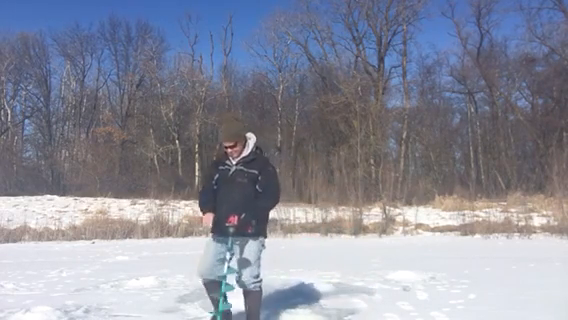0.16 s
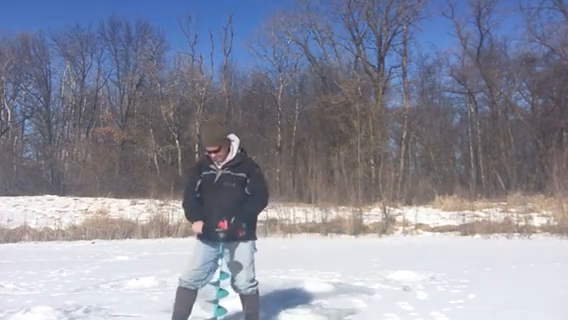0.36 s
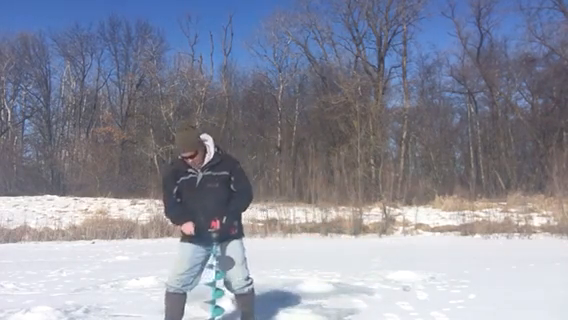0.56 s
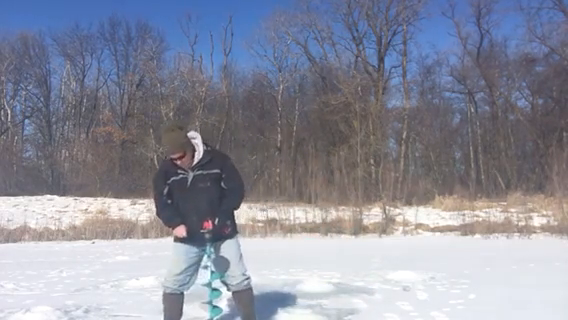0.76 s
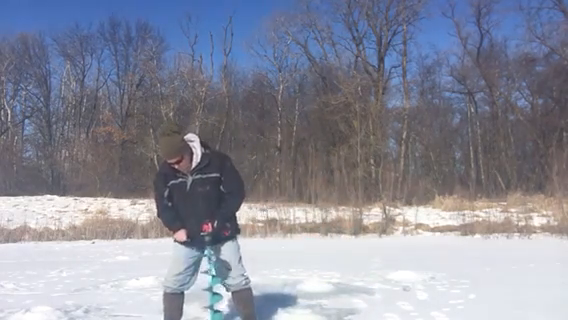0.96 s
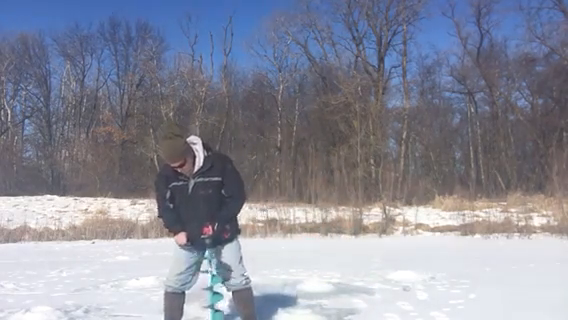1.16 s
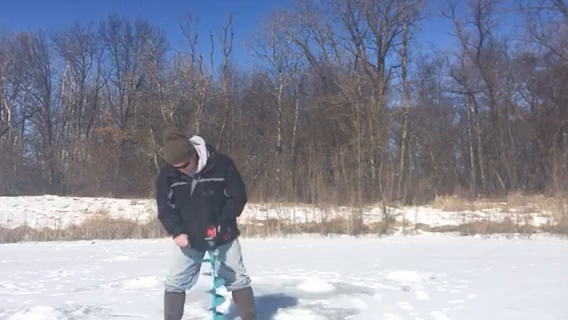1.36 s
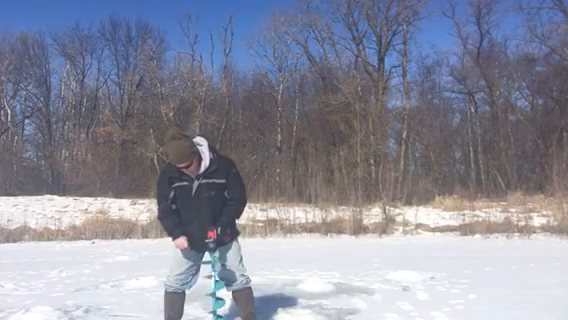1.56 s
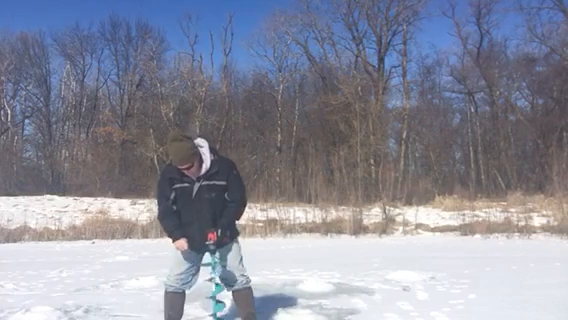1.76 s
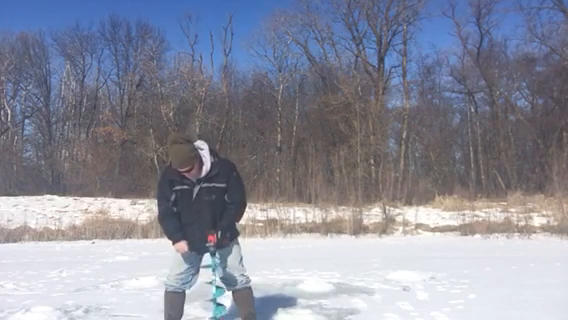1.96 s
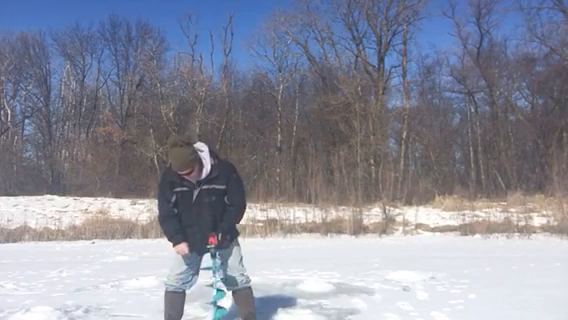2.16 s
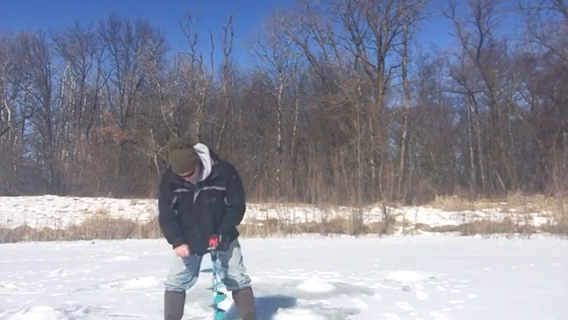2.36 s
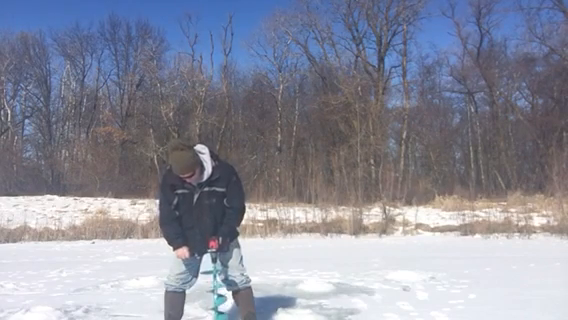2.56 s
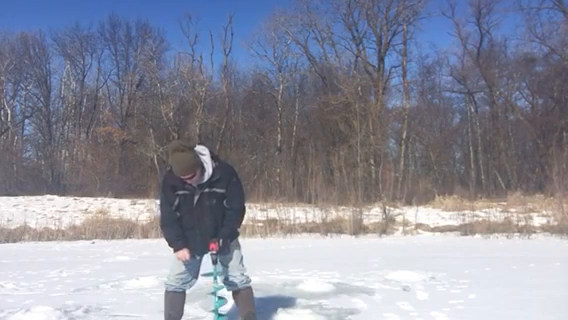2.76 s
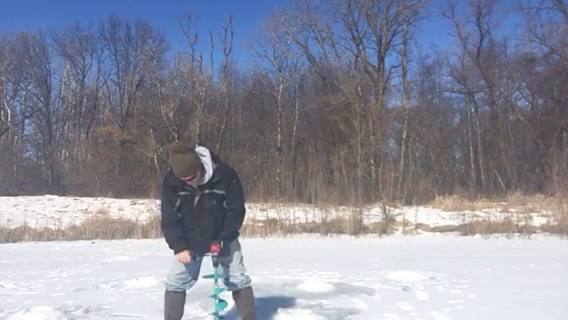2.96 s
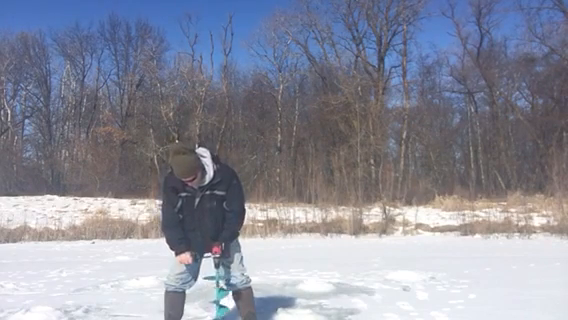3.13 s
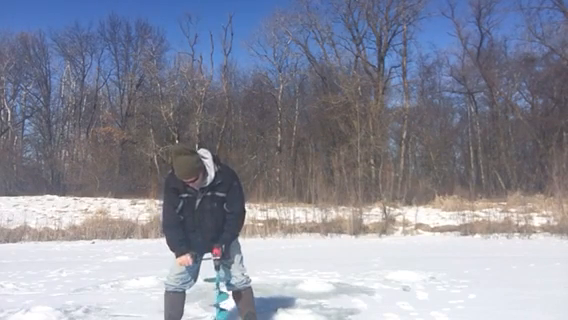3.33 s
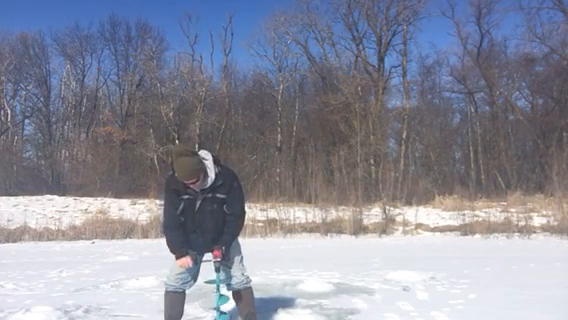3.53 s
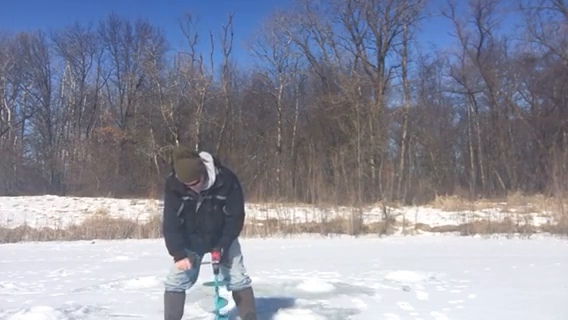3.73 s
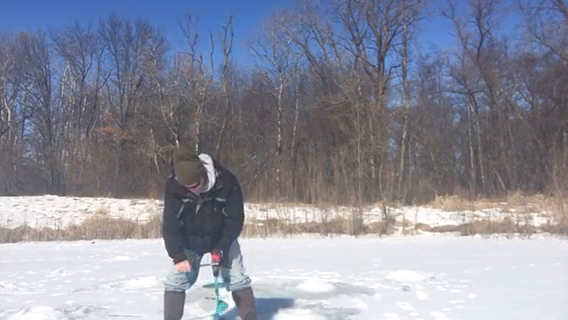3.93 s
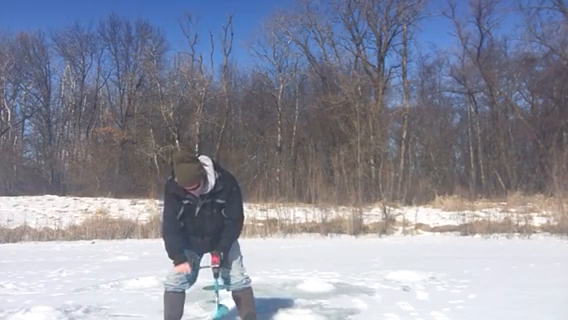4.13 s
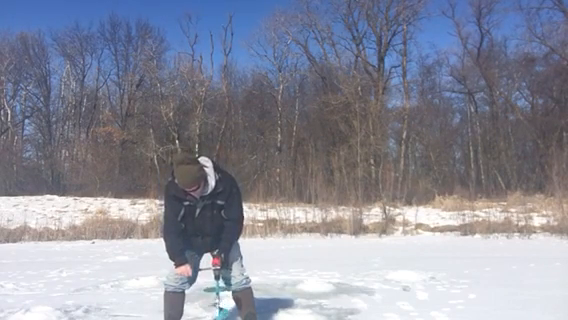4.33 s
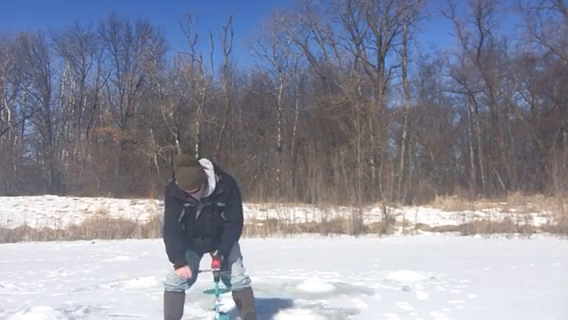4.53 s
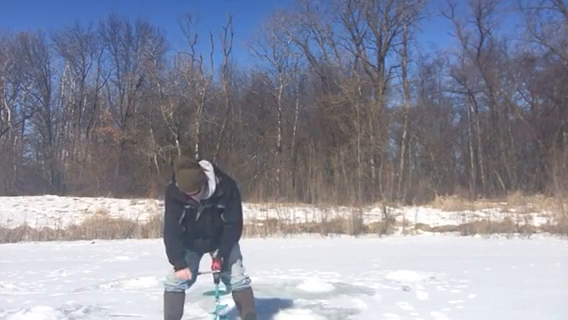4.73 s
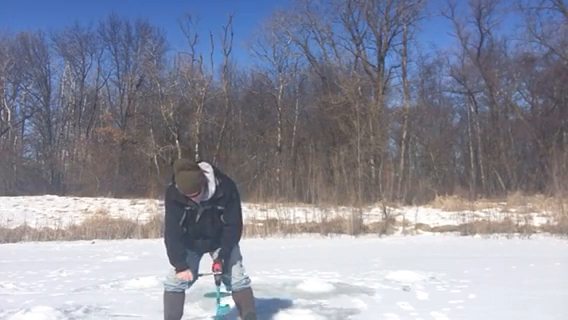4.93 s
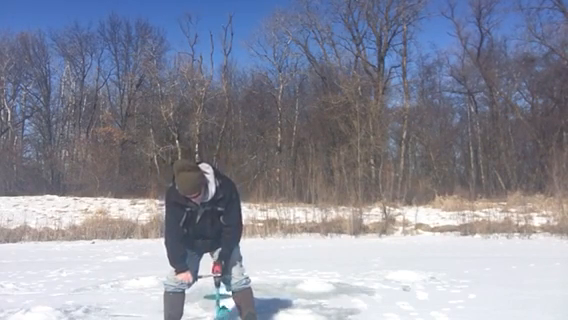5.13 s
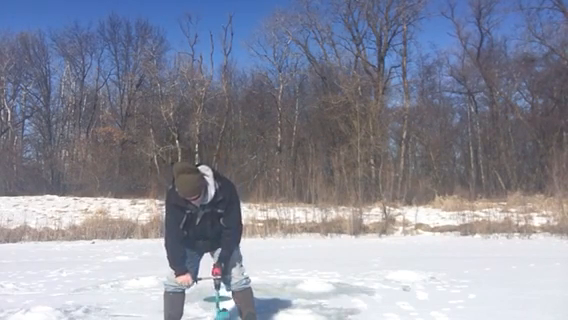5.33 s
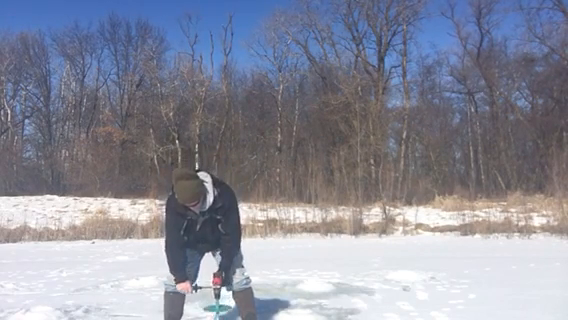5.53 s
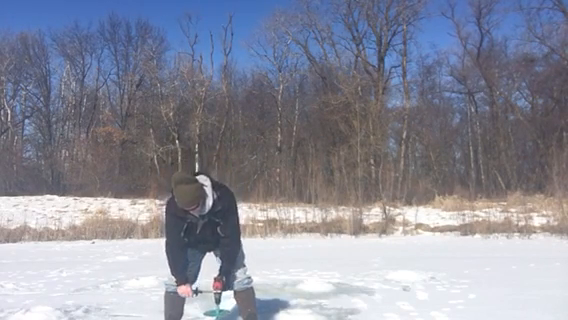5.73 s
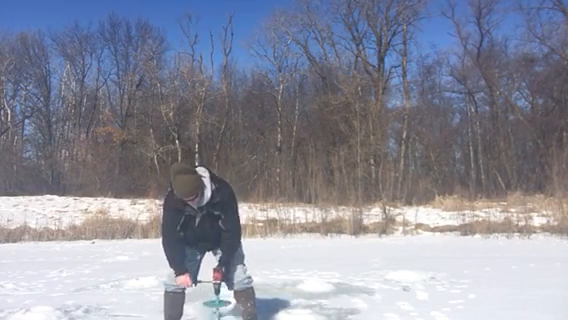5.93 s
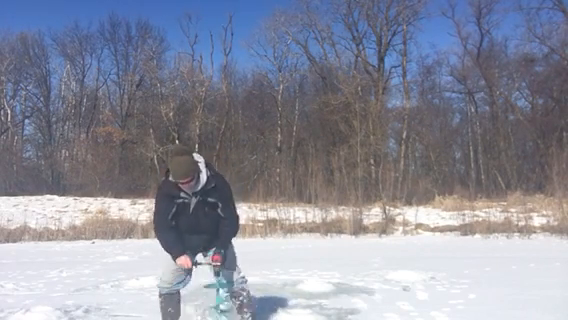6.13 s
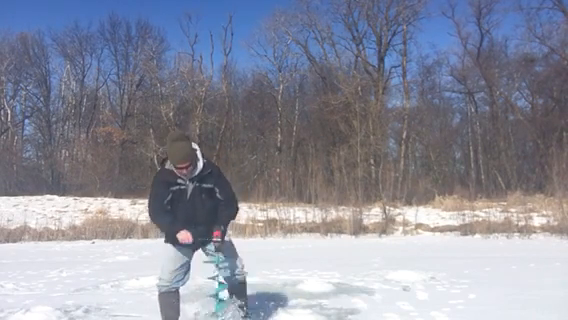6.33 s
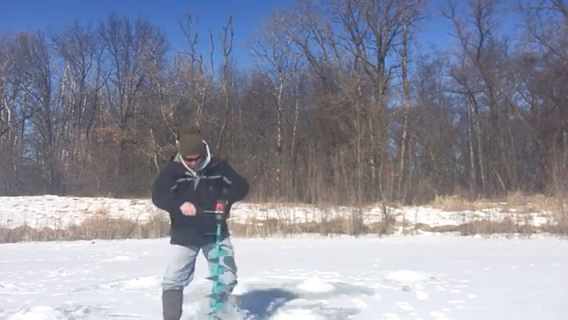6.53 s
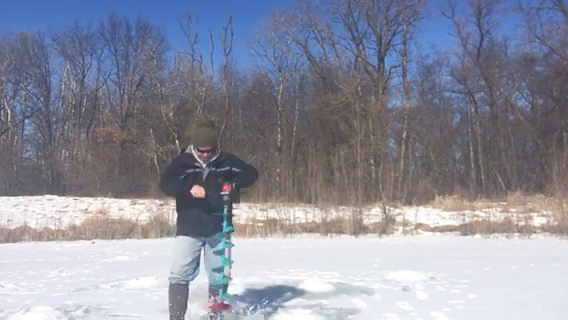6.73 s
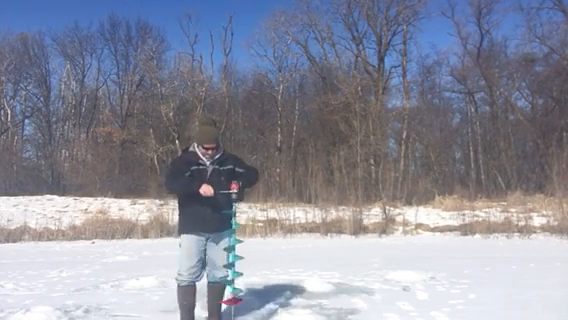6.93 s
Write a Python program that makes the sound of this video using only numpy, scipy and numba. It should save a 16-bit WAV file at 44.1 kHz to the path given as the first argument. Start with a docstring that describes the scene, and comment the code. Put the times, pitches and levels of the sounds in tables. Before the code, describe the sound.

A cordless drill grinds an auger through lake ice, whines higher as it breaks through, and water gulps and slush splashes up.

```python
"""On a frozen lake, some metres from a small mono camera microphone, a cordless drill turns a steel auger.
Light wind rumbles on the microphone and boots shuffle on snow. The auger knocks and rings; its blades
shave dense ice chips, catch once a turn and sound duller as they sink, while the gears whine under load.
The bit breaks through, air pockets ring as water gulps up the hole, and slush spills onto the ice."""
import sys
import numpy as np
from scipy import signal
from scipy.fft import rfft, irfft, next_fast_len
from scipy.io import wavfile
from scipy.ndimage import uniform_filter1d
from numba import njit

SR = 44100
rng = np.random.default_rng(int(sys.argv[2]) if len(sys.argv) > 2 else 0)


def digitize_waveform(pressure):
    """Quantize a signal to 16-bit integers and store it at the path in sys.argv[1].

    Rows of a 2-D input are taken as channels; values are limited to [-1, 1].
    """
    field = np.atleast_2d(pressure).T
    bounded = np.clip(field, -1, 1)
    quanta = np.round(bounded * 32767).astype(np.int16)
    wavfile.write(sys.argv[1], SR, quanta)


N = 308291
T = np.arange(N) / SR

# modes of the steel auger: pitch_hz, gain_db, t60_s before extra damping
AUGER_MODES = [(713, -11.5, 0.11), (1107, -5.5, 0.2), (1440, 0, 0.15), (1630, -19, 0.11),
               (1920, 3.5, 0.039), (2015, -1, 0.16), (2375, -1.5, 0.039), (2686, -4, 0.053),
               (3050, -2.5, 0.066), (3440, -5, 0.25), (3652, -3.5, 0.1), (4130, -28, 0.045),
               (4320, -1, 0.055), (4490, -2.5, 0.1), (5110, -4, 0.058), (5590, -1, 0.057),
               (5670, -12, 0.057), (6690, 0, 0.067), (8060, 1, 0.03)]


def undb(db):
    """Gain of a level in dB."""
    return 10 ** (np.asarray(db) / 20)


def unit(x):
    """Scaled to rms 1."""
    return x / np.sqrt(np.mean(x ** 2))


def curves(table, fade_s=0.045):
    """A gate that is open while a table lasts, then its columns joined in time."""
    times, *columns = np.transpose(table)
    gate = np.clip(np.minimum(T - times[0], times[-1] - T) / fade_s + 1, 0, 1)
    return [gate] + [np.interp(T, times, column) for column in columns]


def swell(middle_s, db, length_s):
    """Gain that rises and falls smoothly round a moment."""
    return undb(db) * np.exp(-(2 * (T - middle_s) / length_s) ** 2)


def walk(rate_hz):
    """Random levels held 1 / rate_hz seconds and slewed twice; spread near 1."""
    hold = int(SR / rate_hz)
    steps = np.repeat(rng.standard_normal(N // hold + 1), hold)
    return 1.9 * uniform_filter1d(uniform_filter1d(steps, hold), hold)[:N]


@njit
def svf(x, hz, width):
    """State-variable band-pass, gain 1 at a centre that may move."""
    y, band_state, low_state = np.empty(len(x)), 0., 0.
    for i in range(len(x)):
        g, k = np.tan(np.pi * hz[i] / SR), width / hz[i]
        v = (band_state + g * (x[i] + 1e-18 - low_state)) / (1 + g * (g + k))
        band_state, low_state = 2 * v - band_state, low_state + 2 * g * v
        y[i] = k * v
    return y


def band(x, hz, width_hz):
    """Band-pass at a fixed or moving centre."""
    return svf(x, hz + np.zeros(len(x)), float(width_hz))


def steep_band(x, hz, width_hz):
    """The same band-pass twice over."""
    return band(band(x, hz, width_hz), hz, width_hz)


def colour(x, spectrum):
    """Shapes x to (freq_hz, gain_db) points, rms 1."""
    hz, db = np.transpose(spectrum)
    size = next_fast_len(N)
    bins_hz = np.arange(size // 2 + 1) * SR / size + 1
    gain = undb(np.interp(np.log(bins_hz), np.log(hz), db))
    return unit(irfft(rfft(x, size) * gain, size)[:N])


def brighten(x, treble_db, edge_hz=1700):
    """Moves the level above the edge."""
    high = signal.sosfilt(signal.butter(2, edge_hz, "high", fs=SR, output="sos"), x)
    return x + (undb(treble_db) - 1) * high


def grains(scatter_db, patchy_db, patch_hz, largest=3.63):
    """Gritty noise, as of tiny fractures: some larger than the rest, coming in patches."""
    noise = rng.standard_normal(N)
    size_db = scatter_db * np.minimum(rng.exponential(size=N), largest)
    return noise * undb(size_db + patchy_db * walk(patch_hz))


def wind():
    """Low turbulence at the microphone: a wavering breeze and a few gusts."""
    # steady rumble: time_s, level_db
    breeze = [(0, -62.5), (1.4, -59), (1.6, -64), (2.6, -63), (4.9, -59), (5.6, -63), (6.0, -62),
              (6.99, -60.5)]
    # gusts: middle_s, level_db, length_s
    gusts = [(0, -47, 0.087), (0.296, -52, 0.083), (.63, -58, 0.073), (1.156, -44.5, 0.14),
             (1.397, -61, 0.08), (4.1, -59, 0.071), (5.145, -57, 0.12), (5.502, -47, 0.14), (5.77, -55, .1)]
    _, db = curves(breeze)
    turbulence = band(band(band(rng.standard_normal(N), 65, 66), 69, 106), 65, 110)
    strength = undb(db + 2.7 * walk(7.7)) + sum(swell(*gust) for gust in gusts)
    return strength * unit(turbulence)


def boots(shore_db=-63):
    """Dry snow crunches under shifting feet, over the far-off rustle of the shore."""
    # spectrum of crunch and rustle: freq_hz, gain_db
    snow_spectrum = [(88, -33), (150, -6.5), (209, -7.5), (244, -7), (430, -7), (598, -5), (1890, -7.5),
                     (2530, -20.5), (4280, -17), (15800, -37.5)]
    # shuffles: middle_s, level_db, length_s, treble_db
    steps = [(.0, -54.5, 0.11, 6), (0.12, -52.5, 0.074, 6.5), (0.223, -54.5, 0.075, 2),
             (.45, -51, 0.21, 8.5), (0.548, -45.5, 0.073, -12), (0.611, -48, 0.1, -4),
             (0.746, -54, 0.16, 8), (0.943, -39.5, 0.14, 8.5)]
    snow = colour(grains(4.1, 1.9, 60.6), snow_spectrum)
    crunch = sum(swell(s, db, length) * brighten(snow, treble_db) for s, db, length, treble_db in steps)
    return crunch + undb(shore_db) * colour(rng.standard_normal(N), snow_spectrum)


def gear_tone(times, hz, db, waver, flicker_db):
    """One slightly unsteady line of the whine, following a pitch curve."""
    gate, hz, db = curves(np.transpose([times, hz, db]))
    level = gate * np.sqrt(2) * undb(db + flicker_db * walk(30))
    return level * np.sin(2 * np.pi * np.cumsum(hz * (1 + waver * walk(80))) / SR)


def drill(second_ratio=1.22, companion_ratio=0.864):
    """Gear teeth whine on several multiples of the motor speed; coasting, they only rasp."""
    # gears dragged down under load, freed at the breakthrough:
    # time_s, tooth_hz, level_db, second_stage_db, lower_companion_db
    gears = [(3.0, 3120, -54, -56, -75), (4.35, 3110, -54, -50, -75), (4.55, 2965, -58, -44, -75),
             (4.8, 3010, -58, -40, -75), (5.0, 2960, -58, -41, -75), (5.16, 3050, -58, -46, -75),
             (5.23, 3120, -60, -51, -75), (5.3, 3400, -64, -47, -75), (5.42, 3610, -64, -44, -75),
             (5.475, 3710, -64, -42, -75), (5.5, 4050, -58, -39, -75), (5.535, 4290, -50, -47, -70),
             (5.62, 4470, -43, -62, -58), (5.78, 4400, -43, -59, -49), (5.95, 4350, -45, -59, -50),
             (6.04, 4420, -43, -58, -52), (6.095, 4330, -44, -60, -46), (6.13, 4225, -52, -62, -49),
             (6.28, 4310, -46, -62, -48), (6.33, 4330, -54, -64, -56), (6.45, 4390, -52, -64, -56),
             (6.6, 4530, -56, -66, -64)]
    # lines of the whine: tooth_rate_multiple, gain_db
    orders = [(1, 0), (1.53, -12), (2, -20), (1.86, -18), (.333, -4)]
    # gears coasting to rest at the start: time_s, tooth_hz, level_db
    coast = [(0, 4350, -64), (.03, 4420, -59), (.06, 4250, -61), (.09, 3900, -63), (.13, 3650, -66),
             (.18, 3050, -66)]
    times, hz, db, second_db, companion_db = np.transpose(gears)
    whine = sum(gear_tone(times, k * hz, db + gain_db, 0.002, 1.5) for k, gain_db in orders)
    whine += gear_tone(times, second_ratio * hz, second_db, 0.005, 1.8)
    whine += gear_tone(times, 2 * second_ratio * hz, second_db - 16, 0.006, 2.5)
    whine += gear_tone(times, companion_ratio * hz, companion_db, 0.004, 2.8)
    gate, coast_hz, coast_db = curves(coast)
    rasp = unit(steep_band(rng.standard_normal(N), coast_hz, 260))
    return whine + gate * undb(coast_db) * rasp


def steel(force, damping, bends, shifts_db, grip_hz=0):
    """A force rings the auger; gripping ice widens a 2 kHz mode by grip_hz, others in proportion."""
    out = np.zeros(len(force))
    for (hz, db, t60), bend, shift_db in zip(AUGER_MODES, bends, shifts_db):
        width = damping * np.log(1000) / np.pi / t60 + grip_hz * hz / 2000
        out += undb(db + shift_db) * band(force, hz * (1 + bend), width) * SR / (2 * np.pi * width)
    return out


def steel_hum(damping, waver, fade_db, soft_hz):
    """Grit keeps the steel humming; ice round the flights damps and bends modes, which come and go."""
    grit = signal.sosfilt(signal.butter(1, soft_hz, fs=SR, output="sos"), grains(4.6, 2.3, 20))
    bends = [waver * walk(5) for _ in AUGER_MODES]
    fades_db = [fade_db * walk(21.985) for _ in AUGER_MODES]
    return unit(steel(grit, damping, bends, fades_db, grip_hz=34))


def slush():
    """Wet ice spills off the free-running flights while the steel hums on; slops and drops land."""
    # spill from the hole: time_s, level_db, treble_db
    spill = [(5.49, -43.5, 6.5), (5.6, -42.5, 6), (5.9, -38.5, 3), (6.1, -41.5, 6.5), (6.4, -37, 2.5),
             (6.55, -36, 4.5), (6.75, -36, -2), (6.99, -43, 6)]
    # spectrum of wet ice: freq_hz, gain_db
    wet_spectrum = [(71, -37), (120, -8.5), (384, -11), (434, -12), (888, -5), (1450, 4.5), (2370, -1),
                    (2840, -11), (4360, -3.5), (4830, -4.5), (6300, -4.5), (10300, -20), (15800, -22)]
    # slops landing on the ice: middle_s, level_db, length_s
    slops = [(6.087, -34, 0.038), (6.131, -29, 0.027), (6.221, -29, 0.021), (6.289, -31, 0.037),
             (6.372, -30.5, 0.054), (6.453, -35, 0.037), (6.718, -31, 0.12), (6.844, -35, 0.03),
             (6.935, -35, .03), (6.982, -37.5, 0.022)]
    # drops spattering: middle_s, level_db, length_s
    drops = [(6.0, -60, .02), (6.135, -48, .015), (6.158, -50, .01), (6.19, -54, .015), (6.22, -51, .02),
             (6.275, -50, .025), (6.335, -54, .012), (6.365, -52, .035), (6.46, -54, .04), (6.5, -56, .015),
             (6.56, -57, .04), (6.61, -57, .02), (6.681, -37, .01), (6.705, -43, .03)]
    gate, db, treble_db = curves(spill)
    wet_ice = colour(grains(2.2, 1, 50), wet_spectrum)
    hum = undb(-4) * steel_hum(damping=2.5, waver=0.005, fade_db=0.54, soft_hz=3000)
    splat = brighten(colour(grains(2.5, 2.2, 90), wet_spectrum), treble_db=-2)
    spatter = unit(band(grains(4, 2, 90), hz=11500, width_hz=9000))
    landing = sum(swell(*slop) for slop in slops) * splat + sum(swell(*drop) for drop in drops) * spatter
    return gate * undb(db) * brighten(wet_ice + hum, treble_db) + landing


def water(ring_s=0.03, ring_cycles=7, slap_t60_s=0.045, count=8000):
    """Trapped air pockets ring and glide up as water slaps shut round them; many small ones gurgle."""
    # gulps in the hole: start_s, level_db, pitch_hz
    gulps = [(5.568, -18, 247), (5.699, -32, 342), (5.736, -27, 247), (5.779, -29, 677),
             (5.873, -22.5, 370), (5.926, -18, 367), (6.051, -10.5, 337), (6.079, -17, 585),
             (6.094, -18, 563), (6.13, -17, 450), (6.146, -16, 640), (6.164, -19, 254), (6.215, -11.5, 615),
             (6.227, -13, 586), (6.276, -15, 282), (6.299, -16, 600), (6.357, -10.5, 614),
             (6.384, -22, 214), (6.458, -24, 380), (6.689, -15.5, 688), (6.693, -18, 258)]
    # gurgle under the gulps: time_s, level_db
    gurgle = [(5.5, -52), (5.7, -50), (6.03, -49), (6.07, -37), (6.2, -39), (6.4, -39), (6.5, -44.5),
              (6.72, -43), (6.99, -60)]
    out, t = np.zeros(N + count), T[:count]
    for start_s, db, hz in gulps:
        attack = 1 - np.exp(-t * hz * 0.8)
        t60 = ring_s + ring_cycles / hz
        cycles = hz * t * (1 + 2 * t) + rng.random()
        pocket = attack * undb(-60 * t / t60) * np.sin(2 * np.pi * cycles)
        slap = band(rng.standard_normal(count) * undb(-60 * t / slap_t60_s), 1.8 * hz, 1.36 * hz)
        i = int(start_s * SR)
        out[i:i + count] += undb(db) * (pocket + slap)
    gate, db = curves(gurgle)
    bubbles = steep_band(grains(3, 3, 40), 270, 150) + undb(-1) * steep_band(grains(3, 3, 40), 600, 350)
    return out[:N] + gate * undb(db + 1.5 * walk(20)) * unit(bubbles)


def knocks(count=12000):
    """A burst of crushed ice and a ring of the steel, struck at a new place each time."""
    # knocks on the auger: start_s, crack_db, ring_db, crack_t60_s, crack_hz, crack_treble_db
    hits = [(0.029, -35, -70, 0.046, 1850, -25), (.18, -30, -69, 0.023, 1220, -16),
            (0.38, -9.5, -28, 0.1, 1730, -8), (.462, -46, -54, .03, 2000, 2),
            (0.52, -28, -63, 0.11, 1430, -25), (0.619, -14.5, -64, 0.036, 720, -33),
            (0.619, -26, -66, 0.025, 1700, -20), (0.701, -18, -67, 0.049, 1340, -41),
            (.768, -48, -66, .03, 1300, -12), (0.874, -26.5, -54, .05, 1510, -1),
            (0.948, -5.5, -25.5, 0.068, 1390, 6.5), (5.871, -17, -50, 0.062, 1300, -16),
            (6.662, -21, -53, 0.021, 3500, 7), (6.678, -23, -48, 0.071, 4370, 13),
            (6.688, -7.5, -21.5, 0.076, 1490, -18.5), (6.7, -10, -32, 0.093, 1760, 2.5),
            (6.841, -19, -60, 0.038, 1880, -14)]
    out, t = np.zeros(N + count), T[:count]
    blow = np.exp(-((t - 0.005) * SR / 2) ** 2) / 3.5  # a short, rounded push
    for start_s, crack_db, ring_db, t60, hz, treble_db in hits:
        burst = rng.standard_normal(count) * np.minimum(t / 0.004, 1) * undb(-60 * t / t60)
        crack = 1.73 * steep_band(burst, hz, 0.51 * hz)
        crack += undb(treble_db) * band(band(burst, 4000, 2700), 4400, 3800)
        bends, shifts = rng.standard_normal((len(AUGER_MODES), 2)).T
        ring = steel(blow, damping=0.97, bends=0.0014 * bends, shifts_db=0.8 * shifts)
        i = int(start_s * SR)
        out[i:i + count] += undb(crack_db) * crack + undb(ring_db) * ring
    return out[:N]


def catches(count=8820):
    """The blades catch once a turn: returns the swell of the cut in dB and puffs of the hole's air."""
    # catches: middle_s, swell_db, length_s, air_column_hz, air_column_db
    snags = [(1.164, 3, 0.02, 700, -58), (1.386, 2.5, 0.035, 700, -44), (1.663, 1, 0.046, 700, -51),
             (1.871, 1.5, 0.054, 700, -46), (2.147, 2, 0.034, 705, -48), (2.325, -1.5, 0.035, 690, -42),
             (2.599, 3.5, 0.032, 720, -32.5), (2.819, 5, 0.054, 633, -35.5), (3.081, 4, 0.046, 624, -31.5),
             (3.328, 1, 0.061, 650, -38), (3.574, 4, 0.076, 900, -37), (3.61, 2, 0.05, 810, -32),
             (3.835, 2.5, 0.059, 845, -41), (4.062, 3, 0.089, 785, -46), (4.34, 5, 0.036, 780, -28),
             (4.587, 3, 0.058, 730, -34.5), (4.834, 3.5, 0.038, 766, -29), (5.112, 1, 0.043, 740, -35.5),
             (5.473, 3, 0.027, 700, -27.5)]
    swell_db, puffs = np.zeros(N), np.zeros(N)
    for middle_s, up_db, length_s, hz, air_db in snags:
        middle = int(middle_s * SR)
        near = slice(middle - count // 2, middle + count // 2)
        bump = np.exp(-(2 * (T[near] - middle_s) / length_s) ** 2)
        swell_db[near] += up_db * bump
        puffs[near] += undb(air_db) * bump * unit(steep_band(rng.standard_normal(count), hz, width_hz=196))
    return swell_db, puffs


def cutting(sink_from_s=1.136, through_s=5.42):
    """Blades shave chips, duller with depth; the steel hums, the hole booms, the thinning ice rumbles."""
    # the cut, from first touch to breakthrough: time_s, level_db, treble_db
    cut = [(.86, -62, -3), (.9, -55, 3), (.94, -29, 3), (1.0, -41, 8), (1.04, -39, 8), (1.07, -32.5, 7),
           (1.17, -27.5, 6.5), (1.27, -26.5, 7), (1.4, -26, 4.5), (1.55, -24, 3), (1.7, -24, 2),
           (1.95, -23.5, 2), (2.2, -23.5, 1), (2.6, -26.5, 1), (3.0, -27.5, 1.5), (3.9, -29.5, 1),
           (4.6, -31, 1), (5.2, -31.5, 0), (5.48, -32.5, -1), (5.495, -42, -4)]
    # chips breaking at the surface: freq_hz, gain_db
    shallow = [(71, -70), (120, -56), (204, -56), (272, -37), (452, -74), (522, -17.5), (944, 4),
               (1710, 1.5), (2900, -12), (4360, 7.5), (4740, 11), (5810, -6), (15800, -55)]
    # chips heard out of the hole: freq_hz, gain_db
    deep = [(71, -52), (120, -37), (266, -29), (313, -4), (481, -7), (785, 4), (1970, 7), (2460, -37),
            (2840, -34), (3630, -4), (3940, -43), (5690, 0), (15800, -13.5)]
    gate, db, treble_db = curves(cut)
    depth = np.interp(T, (sink_from_s, through_s), (0, 1))

    def sinking(surface, bottom, power=1):
        """A value that follows the depth; with a power under 1 it moves fast at first."""
        return surface + (bottom - surface) * depth ** power

    rumble = unit(steep_band(grains(3, 2.7, 12), hz=128, width_hz=100))
    swell_db, puffs = catches()
    grit, deep_share = grains(2.3, 1.06, 70), sinking(0.4, 0.47)
    shaving = (1 - deep_share) * colour(grit, shallow) + deep_share * colour(grit, deep)
    rim_hz, rim_db = sinking(1878, 1215, power=0.74), sinking(6.5, -14.5, power=0.74)
    rim_crunch = band(grains(2.6, 1.6, 70), rim_hz * (1 + 0.06 * walk(9)), 600)
    rim_crunch = unit(band(rim_crunch, rim_hz, 600))
    air = grains(4.1, 0.91, 11)
    boom = unit(band(air, 263.6, 32) + undb(-7) * band(air, 378, 34) + undb(-11.5) * band(air, 203, 77))
    boom_db = np.interp(T, (2.07, 3.1), (-36, -17))
    # the last ice gives way with a dull groan
    groan = swell(middle_s=5.41, db=-48, length_s=0.31) * (rumble + undb(3.5) * unit(band(air, 340, 96)))
    hum = undb(sinking(-6, 0)) * steel_hum(damping=1.3, waver=0.007, fade_db=1.3, soft_hz=6000)
    # coarse fractures grow with the swell of each catch
    fractures = colour(grains(3.2, 3, 60, largest=4), deep)
    bite = undb(-20) * np.maximum(swell_db, 0) * brighten(fractures, treble_db=-20, edge_hz=3500)
    blades = brighten(shaving + hum + bite, treble_db - 0.2 * swell_db)
    blades += undb(rim_db - 0.49 * swell_db) * rim_crunch
    lows = undb(boom_db) * boom + undb(sinking(-56, -17.5)) * rumble
    return gate * undb(db) * (undb(swell_db) * blades + lows) + puffs + groan


def scene():
    """Everything reaches one microphone, some metres from the hole."""
    mono = cutting() + knocks() + drill() + slush() + water() + boots() + wind()
    return np.array([mono, mono])


def record(dry):
    """The small microphone loses the lowest bass; echoes off the camera cut dips; the top is cut."""
    # dips from the camera body: centre_hz, width_hz, depth (0-1)
    notches = [(2554, 1060, 0.52), (2864, 283, 0.75), (4755, 695, 0.82), (7290, 3100, 0.39),
               (10400, 440, 0.53)]
    bass_cut_hz, top_hz = 36, 15750
    x = signal.sosfilt(signal.butter(2, bass_cut_hz, "high", fs=SR, output="sos"), dry[0])
    for hz, width_hz, depth in notches:
        x = x - depth * band(x, hz, width_hz)
    x = signal.sosfilt(signal.ellip(10, 0.2, 80, top_hz, fs=SR, output="sos"), x)
    return np.array([x, x])


dry = scene()
out = record(dry)
digitize_waveform(out)
```